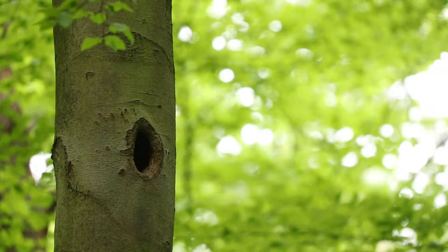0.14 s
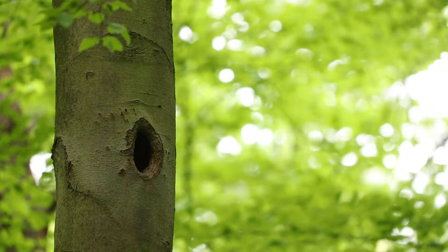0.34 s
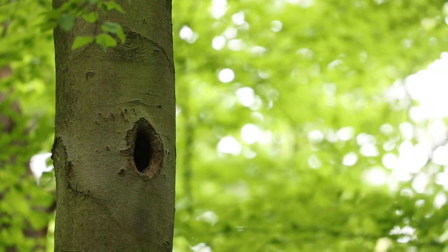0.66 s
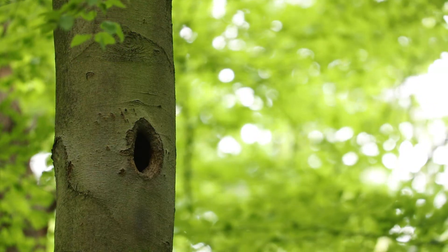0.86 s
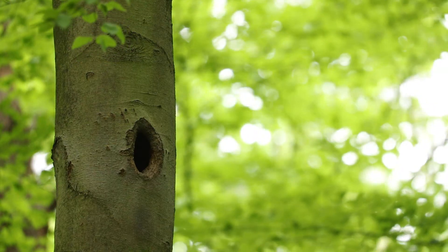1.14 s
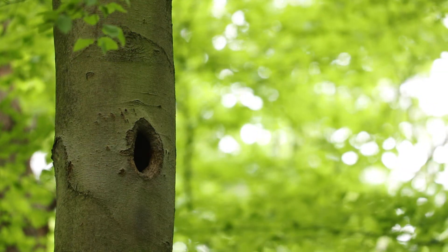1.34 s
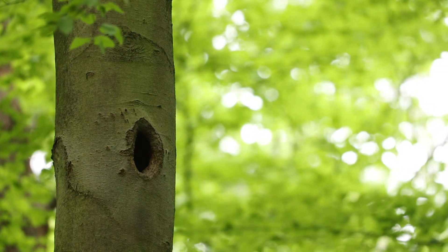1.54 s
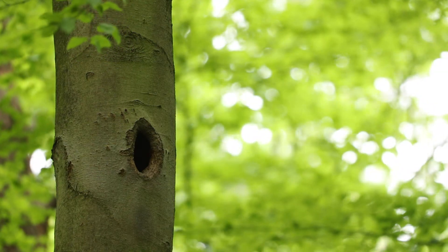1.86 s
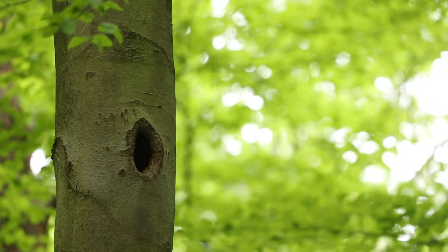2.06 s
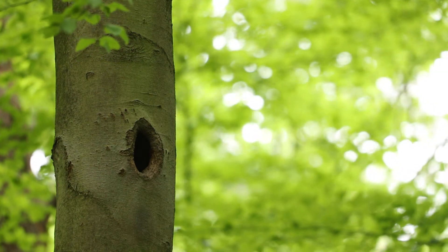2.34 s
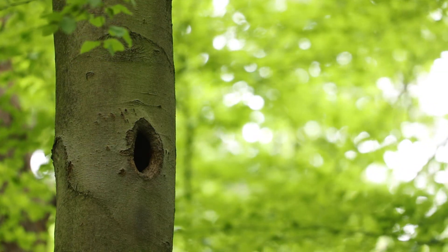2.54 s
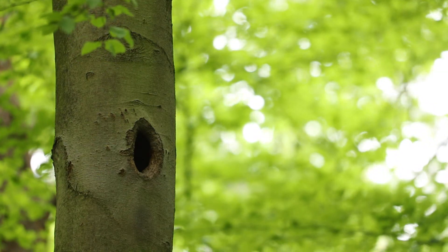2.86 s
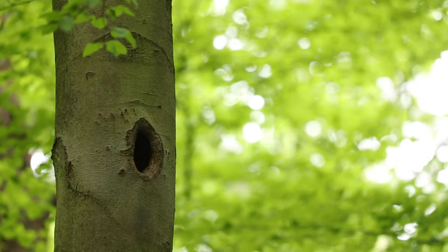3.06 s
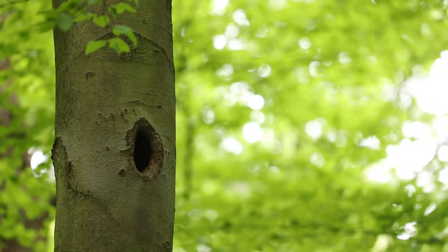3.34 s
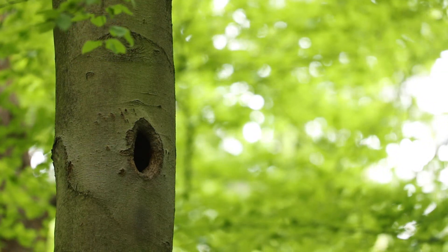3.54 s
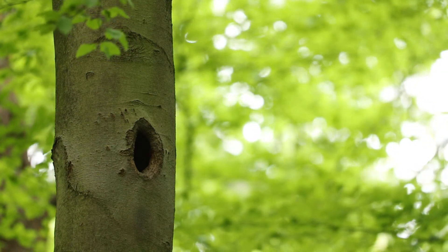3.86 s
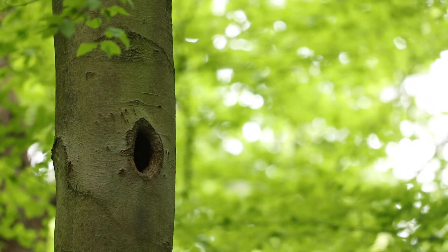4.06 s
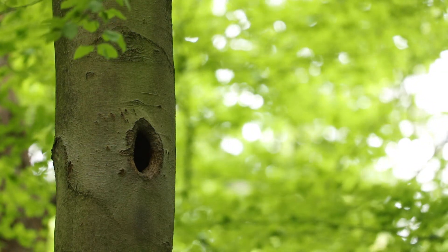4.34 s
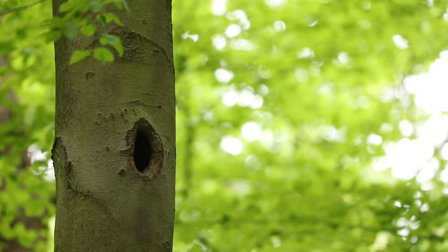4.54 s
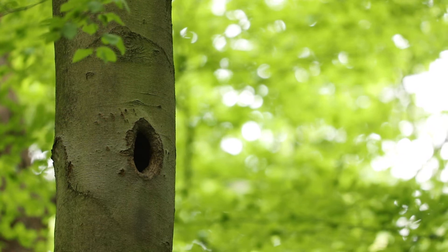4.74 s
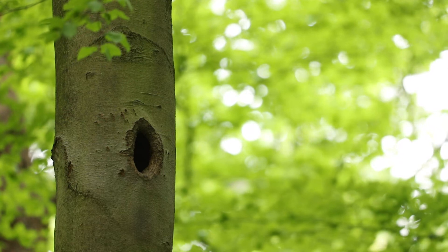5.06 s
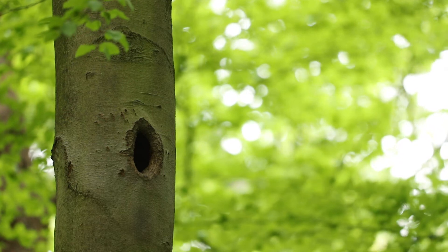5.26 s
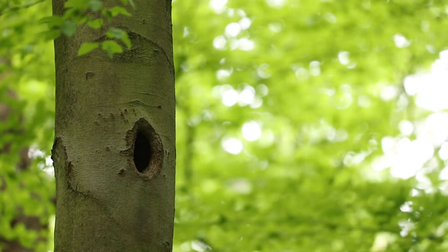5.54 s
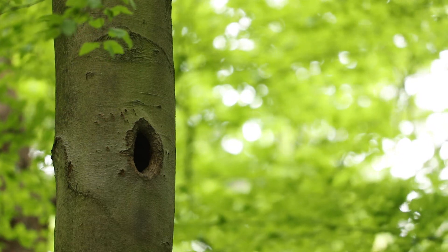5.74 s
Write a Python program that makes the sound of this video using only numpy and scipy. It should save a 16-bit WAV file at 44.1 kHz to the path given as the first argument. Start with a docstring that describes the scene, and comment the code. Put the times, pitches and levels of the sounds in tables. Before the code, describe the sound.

A calm, reverberant wood with a soft steady hush and far songbirds whistling, trilling and buzzing. Low wind rumble and small thumps buffet mainly the right microphone for about two and a half seconds, then stop. After a quieter stretch of sparse whistles, a woodpecker slightly to the right gives a loud rolling call of quick whistled pulses in short groups, with rough bright overtones and echoes from the trees, lasting to the end.

```python
"""A beech wood: a black woodpecker at its nest tree, a little to the right, bursts into its rolling call.
Groups of short pulses, each a flicked whistle with rough overtones, are thrown back by the trunks.
Songbirds far off are slurred sines, repeated notes and pitch-scattered buzzes sent through the wood's echo.
Shaped noise makes the hush and the blurred chorus; for the first seconds low noise and decaying
sine bumps buffet the right microphone."""
import sys
import numpy as np
from scipy import signal
from scipy.fft import rfft, irfft, next_fast_len
from scipy.io import wavfile
from scipy.ndimage import map_coordinates

SR = 44100
rng = np.random.default_rng(int(sys.argv[2]) if len(sys.argv) > 2 else 0)


def to_wav(s):
    """Save 16-bit WAV."""
    ch = np.atleast_2d(s).T  # columns
    pcm = np.round(np.clip(ch, -1, 1) * 32767)  # PCM
    wavfile.write(sys.argv[1], SR, pcm.astype(np.int16))


N = 259749


def amp(db):
    """Decibels to gain."""
    return 10 ** (np.asarray(db) / 20)


def unit(x):
    """Scale to rms 1."""
    return x / np.sqrt(np.mean(x ** 2) + 1e-20)


def along(points, hz):
    """Interpolate (frequency [Hz], value) points on a log-frequency axis."""
    f, v = np.transpose(points)
    return np.interp(np.log(hz + 1), np.log(f + 1), v)


def curve(rows):
    """Interpolate (time [s], value) rows to one value per sample."""
    return np.interp(np.arange(N) / SR, *np.transpose(rows))


def wobble(rate_hz, size):
    """Smooth random curve with rate_hz knots per second."""
    knots = rng.standard_normal(size + 4)
    knots = knots[:int(size * rate_hz / SR) + 4]
    return map_coordinates(knots, [np.arange(size) * rate_hz / SR], mode="nearest")


def filtered(x, response):
    """Multiply the spectrum of x by a response of frequency."""
    m = next_fast_len(N + SR // 2)
    return irfft(rfft(x, m) * response(np.fft.rfftfreq(m, 1 / SR)), m)[..., :N]


def add(track, start_s, sound):
    """Mix a sound into a track at start_s."""
    i = int(np.clip(round(start_s * SR), 0, N - 1))
    track[..., i:i + sound.shape[-1]] += sound[..., :N - i]


def panned(x, pan_db):
    """Stereo pair, left louder by pan_db."""
    return x * amp([[pan_db / 2], [-pan_db / 2]])


def delayed_left(x, lag_s):
    """Sound from the right reaches the left microphone lag_s later: opposite phase slopes."""
    return filtered(x, lambda hz: np.exp(1j * np.pi * hz * lag_s * np.array([[-1], [1]])))


def noise(spectrum):
    """Two unrelated rms-1 noises with the given spectrum."""
    return unit(filtered(rng.standard_normal((2, N)), lambda hz: amp(along(spectrum, hz))))


# decay of the wood's echo: (frequency [Hz], t60 [s])
WOOD_DECAY = [(500, 5.4), (1800, 1.67), (4000, 0.89), (8000, 1.15), (14000, 0.2)]


def forest(x, build_s, early_db, early_t60_s):
    """Scatter from trunks and crowns: near trees answer first, then a long tail that loses its treble."""
    hz, t, z = signal.stft(rng.standard_normal((2, SR + SR // 2)), SR, nperseg=256)
    far = amp(-60 * t / along(WOOD_DECAY, hz)[:, None])
    near = amp(early_db - 60 * t / early_t60_s)
    shape = (far + near) * (1 - np.exp(-t / build_s))
    tail = signal.istft(z * shape, SR, nperseg=256)[1]
    # level referred to the energy at 2 kHz
    tail /= np.sqrt(np.sum(shape[np.searchsorted(hz, 2000)] ** 2) * 128)
    return signal.fftconvolve(np.atleast_2d(x), tail, axes=1)[:, :N]


# hush spectrum: (frequency [Hz], relative level [dB])
HUSH_SPECTRUM = [(12, -28), (20, 3.5), (55, 0), (129, -10), (372, -7.5), (687, -9.5), (1630, -14.5),
                 (2210, -13.5), (2470, -14.5), (3860, -18), (4700, -21), (13500, -36), (15600, -42)]
# left-right correlation of the hush: (frequency [Hz], likeness)
HUSH_LIKENESS = [(40, 0.28), (300, 0.69), (800, 0.6), (2000, 0.21), (8000, 0.0057)]
# balance of the hush: (frequency [Hz], left re right [dB])
HUSH_BALANCE = [(50, 5), (400, 2.5), (1200, 2), (3000, 1), (10000, 1.5)]


def hush(level_db=-47.0):
    """Steady hush of the wood: noise most alike between the ears in the low range, least in the treble."""
    def angle(hz):
        return np.arccos(np.clip(along(HUSH_LIKENESS, hz), -1, 1)) / 2

    def balance(hz):
        return amp(along(HUSH_BALANCE, hz) * np.array([[.5], [-.5]]))

    mid, side = noise(HUSH_SPECTRUM)
    mid = filtered(mid, lambda hz: np.cos(angle(hz)))
    side = filtered(side, lambda hz: np.sin(angle(hz)))
    stereo = filtered(np.array([mid + side, mid - side]), balance)
    gain = amp(level_db + 0.3 * wobble(2.8, size=N))
    return gain * delayed_left(stereo, lag_s=.0002)


# swell of the distant birds: (time [s], relative level [dB])
CHORUS_SWELL = [(0.0, -55.5), (0.64, -45), (1.01, -48), (1.93, -54), (2.53, -55), (3.67, -61.5),
                (4.5, -54.5)]
# spectrum of their blurred song: (frequency [Hz], relative level [dB])
CHORUS_SPECTRUM = [(1200, -55), (2400, -23.5), (3200, 2.5), (4200, 1.5), (5500, -16.5), (7000, -17.5),
                   (12000, -64)]


def chorus(trim_db=-3):
    """Very distant birds blurred together: band noise of uneven level."""
    level_db = curve(CHORUS_SWELL) + trim_db + 2.5 * wobble(12, size=N)
    return amp(level_db) * noise(CHORUS_SPECTRUM)


# rumble spectrum: (frequency [Hz], relative level [dB])
RUMBLE_SPECTRUM = [(15, -31), (45, 3.5), (120, -2), (200, -15), (350, -27.5), (700, -78), (2000, -120)]
BUFFET_END_S, BUFFET_RELEASE_S = 2.423, 0.097


def rumble(level_db=-40, gust_db=4.5):
    """Uneven low noise that holds, then dies away; two unrelated signals."""
    gusts = amp(level_db + gust_db * wobble(24.76, size=N))
    ceasing = curve([(BUFFET_END_S, 1), (BUFFET_END_S + BUFFET_RELEASE_S, 0)])
    return gusts * ceasing * noise(RUMBLE_SPECTRUM)


# bumps on the microphone: (time [s], relative level [dB], hardness as upper thud re peak [dB])
MIC_BUMPS = [(0.008, -28.5, -14.5), (0.468, -30.5, -27), (0.68, -28, -26), (0.797, -26, -13),
             (1.247, -27, -11), (1.321, -29.5, -20.5), (1.386, -29, -31), (1.76, -27, -20),
             (1.804, -24.5, -20.5), (1.964, -28.5, -16), (2.296, -25.5, -18.5), (2.334, -28.5, -21)]


def bumps(track, trim_db=8, hz_at_0db=280, life_s_at_0db=0.0027, quickening=0.34):
    """Soft bumps as decaying sines; a harder bump is a shorter, higher push."""
    t = np.arange(SR // 10) / SR
    for start_s, db, thud_db in MIC_BUMPS:
        quick = amp(quickening * thud_db)
        push = np.sin(2 * np.pi * hz_at_0db * quick * t) * np.exp(-t * quick / life_s_at_0db)
        add(track, start_s, amp(db + trim_db) * push)


def buffeting():
    """Rumble and bumps, mostly on the right microphone; part of the left rumble is its own."""
    right, left_own = rumble()
    bumps(right)
    left = amp(-22.5) * right + amp(-19.5) * left_own
    return delayed_left(np.array([left, right]), lag_s=0.00029)


def whistle(length_s, start_hz, end_hz, waver=0.007, glide_waver=.07):
    """One rms-1 slurred sine; gliding notes quiver more than held ones."""
    u = np.linspace(0, 1, max(int(length_s * SR), 64))
    quiver = waver + min(glide_waver * abs(np.log(end_hz / start_hz)), .028)
    glide = start_hz * (end_hz / start_hz) ** u
    pitch = glide * (1 + quiver * wobble(220.1, size=SR // 2)[:len(u)])
    return unit(signal.windows.tukey(len(u), 1 / 3) * np.sin(2 * np.pi * np.cumsum(pitch) / SR))


# single slurred whistles: (time [s], length [s], start [Hz], end [Hz], relative level [dB])
SLURRED_NOTES = [(0, 0.092, 2440, 2360, -53.5), (1.48, 0.068, 3680, 3750, -46.5),
                 (1.831, 0.19, 1700, 1812, -57), (2.091, .21, 2350, 1667, -50.5),
                 (2.38, .11, 2150, 2316, -52), (2.449, 0.15, 2835, 2828, -47.5),
                 (2.64, 0.043, 2230, 2184, -51.5), (2.921, 0.077, 2950, 3100, -51),
                 (3.098, 0.15, 2864, 2704, -57), (3.329, .14, 2515, 2322, -46.5),
                 (3.47, .11, 2325, 2195, -45), (3.541, 0.093, 1550, 1862, -53.5),
                 (3.78, 0.081, 2190, 2128, -44.5), (3.869, .11, 2197, 2286, -47),
                 (4.182, .05, 1750, 2240, -50), (4.22, 0.0394, 2226, 2306, -47),
                 (4.25, .14, 3950, 4160, -59.5), (4.28, 0.16, 7780, 7920, -70),
                 (4.446, 0.19, 1700, 1815, -51), (4.983, 0.16, 2200, 3117, -46.5),
                 (5.113, 0.086, 3150, 2800, -47), (5.389, .12, 2740, 2792, -50),
                 (5.551, 0.077, 4720, 4186, -45)]
# later whistles come from the left: (time [s], left re right [dB])
SLURRED_PAN = [(2, -0.5), (4, 4.5)]


def whistles(song, trim_db=0):
    """Single far whistles, each one sliding sine."""
    for start_s, length_s, start_hz, end_hz, db in SLURRED_NOTES:
        pan_db = np.interp(start_s, *np.transpose(SLURRED_PAN))
        note = amp(db + trim_db) * whistle(length_s, start_hz, end_hz)
        add(song, start_s, panned(note, pan_db))


# birds repeating one note: (first [s], until [s], period [s], note length [s],
# start [Hz], end [Hz], first relative level [dB], last relative level [dB])
REPEATED_NOTES = [(0.374, 1.57, 0.26, 0.064, 4254, 4270, -46.5, -48),
                  (.495, 1.6, 0.27, 0.069, 6030, 6204, -57, -56),
                  (0.037, 0.69, .091, 0.056, 5840, 3320, -53.5, -53),
                  (0.093, .76, 0.092, 0.029, 3260, 2930, -58, -47.5),
                  (0.789, 1.1, 0.16, 0.051, 4620, 3106, -46.5, -52.5),
                  (.83, 1.26, 0.16, 0.12, 4860, 4830, -57, -56),
                  (.84, 1.2, .153, 0.0343, 3200, 2664, -49.5, -46.5),
                  (.95, 1.22, .077, 0.032, 3740, 3624, -48.5, -47),
                  (1.91, 2.73, .11, .025, 4095, 3100, -49.5, -51),
                  (2.18, 2.9, .11, 0.021, 5400, 4090, -60, -53)]


def trills(song, trim_db=0):
    """One slurred note repeated at a fixed period, its level ramping."""
    for first_s, last_s, period_s, length_s, start_hz, end_hz, first_db, last_db in REPEATED_NOTES:
        for start_s in np.arange(first_s, last_s, period_s):
            db = np.interp(start_s, [first_s, last_s], [first_db, last_db])
            add(song, start_s, amp(db + trim_db) * whistle(length_s, start_hz, end_hz))


# buzzy notes: (time [s], centre [Hz], relative level [dB])
BUZZY_NOTES = [(1.26, 5360, -55), (1.478, 3941, -53), (1.603, 2743, -53.5), (2.97, 2155, -57.5),
               (3.144, 4850, -60), (3.22, 2684, -56), (3.76, 3580, -57), (4.99, 2650, -48)]
BUZZ_S, BUZZ_WIDTH = .16, 0.0854  # length; pitch scatter as a share of the centre


def buzzes(song, trim_db=0):
    """Sines roughened by fast random pitch scatter."""
    for start_s, hz, db in BUZZY_NOTES:
        pitch = hz * (1 + BUZZ_WIDTH * wobble(300, size=SR // 2)[:int(BUZZ_S * SR)])
        note = np.hanning(len(pitch)) * np.sin(2 * np.pi * np.cumsum(pitch) / SR)
        add(song, start_s, amp(db + trim_db) * unit(note))


def songbirds():
    """Far whistles, trills and buzzes, heard mostly through the echo of the wood."""
    song = np.zeros((2, N))
    whistles(song)
    trills(song)
    buzzes(song)
    echo = forest(song, build_s=.012, early_db=-9, early_t60_s=.2)
    return amp(-5.5) * song + amp(3) * echo


# groups of evenly spaced pulses: (time [s], spacing [s], pitch [Hz], relative level of each pulse [dB])
CALL_GROUPS = [(4.613, 0.036, 1890, [-20, -18.5, -17]), (4.8087, 0.038, 1757, [-18.5, -18.5, -18, -18]),
               (5.043, 0.037, 1736, [-23.5, -18, -17.5, -19.5]), (5.275, .034, 1763, [-19, -24, -21.5]),
               (5.461, .0346, 1770, [-26, -23.5, -16]), (5.639, .035, 1760, [-25, -18, -18]),
               (5.827, 0.036, 1797, [-24, -22.5])]
FIRST_PULSE_FLAT = .022  # share below the group's pitch


def pulses():
    """(time [s], pitch [Hz], relative level [dB]) of every pulse; each group's first is flat."""
    return [(start_s + k * spacing_s, hz * (1 - FIRST_PULSE_FLAT * (k == 0)), db)
            for start_s, spacing_s, hz, levels in CALL_GROUPS for k, db in enumerate(levels)]


# one pulse: (time since its start [s], pitch re mean [ratio], relative amplitude)
PULSE_COURSE = [(0, .985, 0), (.0022, 1.03, .88), (.005, 1.006, 1.05), (.009, .988, .97), (.013, .984, .58),
                (.0205, .99, 0)]
# shrill overtones: (harmonic number, relative level [dB])
SHRILL_HARMONICS = [(3, -4.5), (4, 1.5), (5, -3), (6, -12.5), (7, -16.5), (8, -24)]
# edge of the call: (time [s], second harmonic [relative dB], shrill harmonics [relative dB],
# their tilt [dB per harmonic])
CALL_EDGE = [(4.68, -39, -55.5, -9.5), (4.82, -35.5, -45, 1), (5.15, -36, -42.5, .5), (5.8, -31, -45.5, -1)]
# breath-like rasp spectrum: (frequency [Hz], relative level [dB])
RASP_SPECTRUM = [(600, -14.5), (1800, -3), (3500, -15.5), (6000, -15), (9000, -23), (15000, -40)]
# soft upward slur opening the call: (time [s], length [s], start [Hz], end [Hz], relative level [dB])
OPENING_SLUR = (4.585, .014, 1420, 1690, -34)
# unrelated tones the voice cracks into: (frequency [Hz], relative level [dB])
CRACK_TONES = [(1330, -39.5), (1850, -38), (2400, -29.5)]
CRACK_START_S = 4.718


def woodpecker(jitter=0.017, rasp_db=-30, tone_db=2.0, second_db=-0.5, shrill_db=-0.5):
    """Each pulse is a whistle that flicks up and sags; its rough overtones scatter more among the trees."""
    tone, edge, effort = np.zeros(N), np.zeros(N), np.zeros(N)
    t = np.arange(SR // 40) / SR
    at_s, bend, swell = np.transpose(PULSE_COURSE)
    envelope = np.interp(t, at_s, swell, right=0)
    # shrill overtones break out at full strength, once the pitch has begun to sag
    strain = np.interp(t, [.001, .006, .01, .018], [0.11, 1.29, 0.54, 0.1])
    edge_s, *edge_columns = np.transpose(CALL_EDGE)
    for start_s, hz, db in pulses():
        second, shrill, tilt = (np.interp(start_s, edge_s, column) for column in edge_columns)
        pitch = hz * np.interp(t, at_s, bend) * (1 + jitter * wobble(785, size=len(t)))
        phase = 2 * np.pi * np.cumsum(pitch) / SR
        sagging = hz * (1.01 - 3.4 * t) * (1 + .021 * wobble(750, size=len(t)))
        rough_phase = 2 * np.pi * np.cumsum(sagging) / SR
        upper = sum(amp(level + tilt * (k - 4.5)) * np.sin(k * rough_phase)
                    for k, level in SHRILL_HARMONICS)
        add(tone, start_s, amp(db + tone_db) * envelope * np.sin(phase))
        add(edge, start_s, amp(second + second_db) * envelope * np.sin(2 * phase))
        add(edge, start_s, amp(shrill + shrill_db) * strain * upper)
        add(effort, start_s, amp(db) * envelope)
    edge = edge + amp(rasp_db) * effort * noise(RASP_SPECTRUM)[0]

    start_s, length_s, start_hz, end_hz, db = OPENING_SLUR
    add(tone, start_s, amp(db) * whistle(length_s, start_hz, end_hz))
    crack_envelope = np.interp(2.4 * t, at_s, swell, right=0)  # 2.4 times quicker than a pulse
    for hz, db in CRACK_TONES:
        add(tone, CRACK_START_S, amp(db + 4.5) * crack_envelope * np.sin(2 * np.pi * hz * t))

    direct = delayed_left(panned(tone, -7.0) + panned(edge, -9), lag_s=0.00016)
    echo = forest(amp(-6) * tone, build_s=.004, early_db=-7, early_t60_s=.14)
    glitter = forest(amp(6) * edge, build_s=0.0021, early_db=-11, early_t60_s=0.12)
    return direct + echo + panned(glitter, -0.54)


def scene():
    """All sources at the two microphones."""
    return hush() + chorus() + buffeting() + songbirds() + woodpecker()


TOP_HZ = 15720


def record(dry):
    """Band limit: nothing from TOP_HZ up is kept."""
    return filtered(dry, lambda hz: hz < TOP_HZ)


dry = scene()
out = record(dry)
to_wav(out)
```